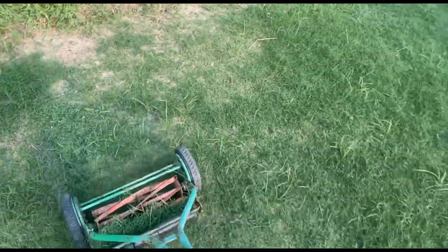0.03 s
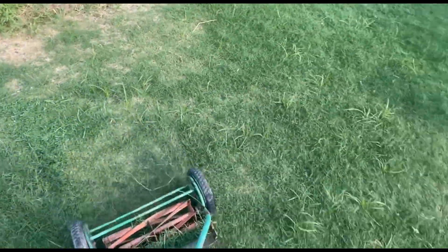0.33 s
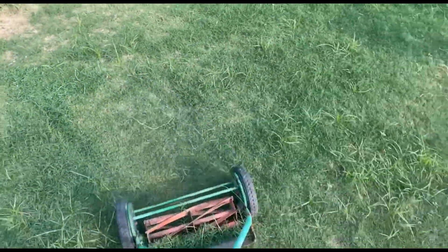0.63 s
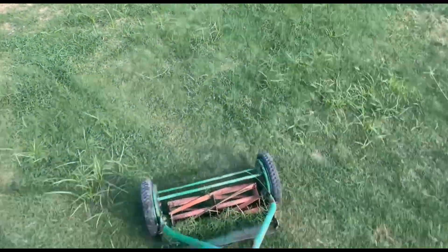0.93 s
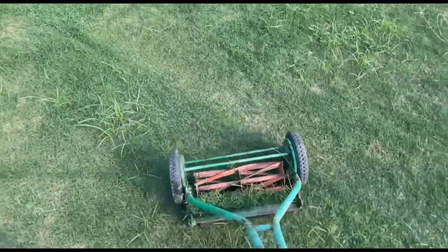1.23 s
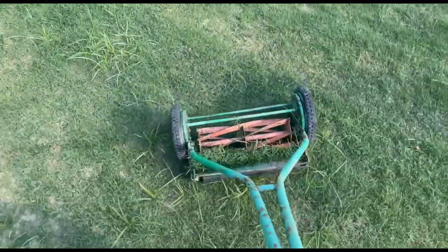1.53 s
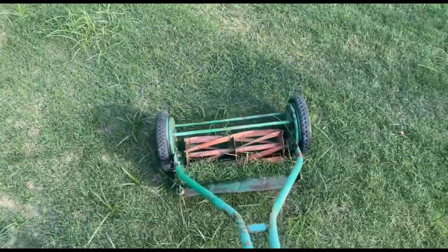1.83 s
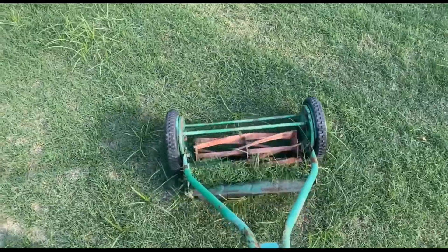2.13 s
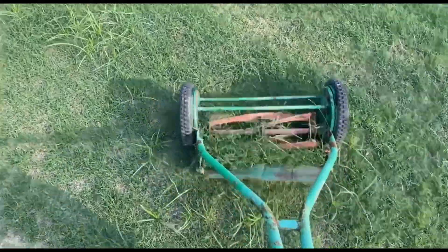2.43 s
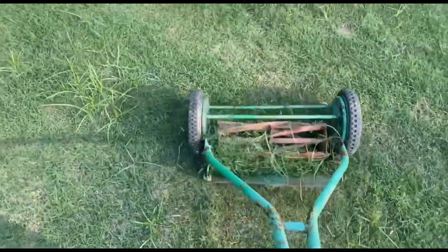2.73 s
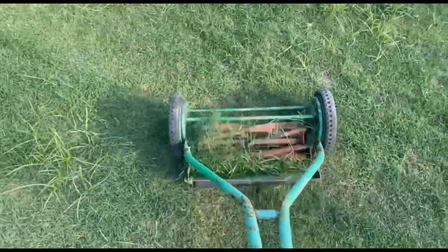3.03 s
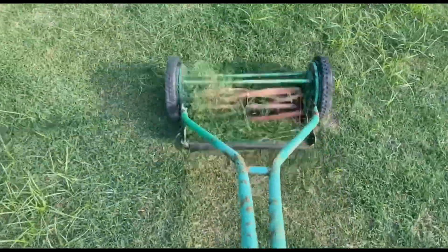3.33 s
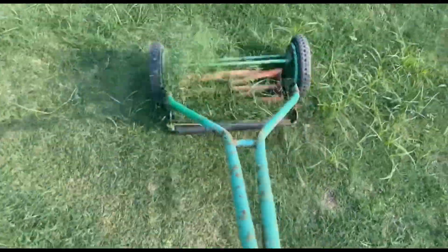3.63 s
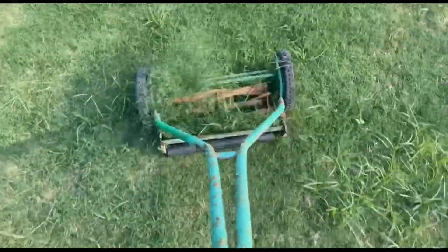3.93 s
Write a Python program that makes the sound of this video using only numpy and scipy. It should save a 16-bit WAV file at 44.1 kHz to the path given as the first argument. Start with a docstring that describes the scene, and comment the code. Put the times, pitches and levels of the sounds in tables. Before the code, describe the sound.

A hand-pushed reel mower rolls backward outdoors with ratchet clicks, a loose rattle and tyres brushing grass. After a brief lull and a clunk, its blades spin up into a louder metallic whir, clinking and shearing the grass.

```python
"""Ratchets clack and a loose frame rattles as a hand-pushed reel mower is drawn back over a lawn,
its tyres brushing the grass. It almost stops, takes up its gears with a clunk and is pushed forward.
The reel spins up: each blade scrapes along the bed knife, exciting its modes by friction,
and snips grass, louder as the speed rises. Faint outdoor air lies beneath."""
import sys
import numpy as np
from scipy import signal
from scipy.io import wavfile
from scipy.ndimage import uniform_filter1d

SR = 44100
rng = np.random.default_rng(int(sys.argv[2]) if len(sys.argv) > 2 else 0)


def pcm_store(signal):
    """Save signal as 16-bit PCM."""
    levels = np.round(np.clip(np.atleast_2d(signal), -1, 1) * 32767)
    wavfile.write(sys.argv[1], SR, levels.astype(np.int16).T)


N = 176400
TIME = np.arange(N) / SR
GEARS_ENGAGE_S = 2.069


def reel():
    """Amplitude modulation: scraping and cutting pulse at the blade-passing frequency."""
    # blade-passing frequency: t/s, f/Hz
    speed = [(2.16, 14.63), (2.32, 21.99), (2.48, 24.94), (2.62, 32.6), (2.76, 30.56), (2.98, 32.93),
             (3.14, 41.42), (3.32, 45.86), (3.48, 53.89), (3.6, 51.57), (3.8, 44), (4, 42)]
    # forward push: t/s, scraping level/dB, cutting level/dB
    push = [(2.06, -75, -93), (2.075, -36, -32.5), (2.16, -34, -56), (2.19, -33, -49), (2.35, -28, -37),
            (2.46, -26, -34.5), (2.6, -27.5, -30.5), (2.85, -24, -32), (3.02, -26, -27.5),
            (3.12, -22, -23.5), (3.3, -24, -22.5), (3.45, -24, -18.5), (3.58, -20, -20), (3.66, -27, -21.5),
            (3.85, -26, -21), (4, -33, -24)]
    scrape_db, cut_db = curve(push, axis=1), curve(push, axis=2)
    passes = np.cumsum(curve(speed, axis=1) * (TIME >= speed[0][0])) / SR
    early, detune = rng.standard_normal((2, 200))  # each blade meets the knife a little differently
    jitter = .07 * np.minimum(passes, 1) * np.interp(passes, np.arange(len(early)), early)
    passes = np.maximum(passes + jitter, 0)
    tuning = 1 + .032 * detune[passes.astype(int)]
    rubs = blade_swells(passes, sharpness=1.3, floor=.32)
    snips = blade_swells(passes, sharpness=1.1, floor=.65)
    steel = bed_knife(amp(scrape_db) * rubs, tuning)
    return steel + grass(snips, cut_db, scrape_db, passes > 0) + housing(cut_db) + stalk()


def blade_swells(passes, sharpness, floor):
    """Periodic contact: one uneven swell per blade; at speed the helical blades overlap."""
    strength = amp(1.5 * rng.standard_normal(200))[passes.astype(int)]
    passing_hz = np.gradient(passes) * SR
    overlap = floor + .28 * (passing_hz / 50) ** 2
    swell = (overlap + strength * (np.sin(np.pi * passes) ** 2) ** sharpness) / (overlap + .5)
    return swell / np.sqrt(np.mean(swell[passes > 0] ** 2))


def bed_knife(friction, tuning):
    """Frictional excitation: blades rub and catch on the knife, which rings, scrapes and clinks."""
    # knife modes: f/Hz, bandwidth/Hz, relative level/dB
    modes = [(345, 92, -6.5), (791, 110, -6), (1790, 70, -19), (2230, 17, 2), (2552, 17, 5),
             (2774, 17, 11.5), (3324, 42, -0.5), (5450, 39, -11)]
    # spectrum of scraping steel: f/Hz, relative level/dB
    spectrum = [(100, -31), (300, -10), (600, -21.5), (1400, -16), (2600, -3), (4000, -14.5), (5400, -18),
                (6300, -34.5), (15000, -31)]
    # hard catches of a blade: t/s, scraping level/dB, duration/s, ring f/Hz, ring level/dB
    catches = [(2.179, -27, 0.014, 2720, -25), (2.226, -48, 0.017, 2580, -28),
               (2.251, -26, 0.0045, 2530, -28), (2.292, -21, 0.0068, 2920, -29),
               (2.33, -21, 0.0018, 2745, -22), (2.417, -33, 0.0065, 820, -26.5),
               (2.469, -20, 0.0037, 2500, -30), (2.511, -25, 0.0059, 3330, -20),
               (2.671, -24.5, 0.0064, 2750, -15.5), (2.701, -14, 0.0028, 2565, -13.5),
               (2.814, -17, 0.041, 2796, -25), (2.893, -23, 0.0073, 2613, -19.5),
               (3.063, -23.5, 0.0062, 2667, -18), (3.117, -12, 0.0026, 3330, -21),
               (3.213, -29, 0.0066, 2680, -16), (3.558, -13.5, 0.0092, 2790, -14),
               (3.836, -14.5, 0.0065, 2800, -21)]
    catching = sum(burst(start, db, length) for start, db, length, _, _ in catches)
    force = friction * grains(per_s=1700, spread_db=2) + catching * grains(per_s=9500, spread_db=1)
    steel = amp(-5) * ring(force, modes, wander_db=3, tuning=tuning) + amp(-10) * colour(force, spectrum)
    blades = sum(blade_ring(start, length, hz, db) for start, _, length, hz, db in catches)
    clinks = tinkles(per_s=450, spread_db=2, low_hz=1400, high_hz=4900, fade_s=.003)
    return steel + blades + amp(-7) * friction * clinks


def blade_ring(start, length, hz, db, linewidth_hz=70):
    """Phase noise broadens the swelling note of a caught blade into a rasp."""
    age = np.maximum(TIME - start, 0) / length
    swell = amp(db) * age * np.exp((1 - age ** 2) / 2)
    rasp = np.cumsum(rng.standard_normal(N)) * np.sqrt(2 * np.pi * linewidth_hz / SR)
    return swell * np.sin(2 * np.pi * hz * TIME + uniform_filter1d(rasp, size=24))


def grass(snips, cut_db, scrape_db, turning):
    """Fracture noise: many tiny breaks add up to a snip, a fine crackle and a bright shearing."""
    # spectra of the snip and of the crackle: f/Hz, relative level/dB
    snip_spectrum = [(100, -21.5), (400, -24), (620, -21), (800, 8), (920, 3), (1140, 4.5), (1270, 0),
                     (1420, 2), (1600, 4.5), (1870, -5.5), (2150, 1), (2330, -1.5), (2720, 6.5), (3050, 1),
                     (3330, 3.5), (3900, -5.5), (4450, -6), (5200, -9.5), (6000, -19), (7500, -27.5),
                     (15000, -35)]
    crackle_spectrum = [(2000, -16), (4500, 3), (12000, 5.5), (15000, 1), (16000, 1)]
    snip = amp(cut_db) * snips * grains(per_s=6000, spread_db=.5)
    fine = tinkles(per_s=6000, spread_db=1.5, low_hz=4000, high_hz=15860, fade_s=.0015)
    crunch = unit(fine + .6 * grains(per_s=130, spread_db=3))
    crackle = amp(scrape_db - 24) * turning * snips * crunch
    shear = tinkles(per_s=1200, spread_db=3.5, low_hz=3060, high_hz=5060, fade_s=.0013)
    shear_db = -38 + 4.1 * (cut_db + 22.5)  # thick grass: shearing grows faster than the cutting level
    return colour(snip, snip_spectrum) + colour(crackle, crackle_spectrum) + amp(shear_db) * snips * shear


def stalk():
    """Sudden fracture: a tough stalk snaps in one broadband burst."""
    # spectrum of the snap: f/Hz, relative level/dB
    spectrum = [(300, -8), (900, 0.5), (4500, 10.5), (6500, -10), (15000, -14)]
    return colour(burst(start=3.977, db=-19.5, length=.016) * grains(per_s=5200, spread_db=5), spectrum)


def housing(cut_db):
    """Structure-borne sound: with the gears engaged, the housing's rumble follows the cutting level."""
    # spectrum of the rumble: f/Hz, relative level/dB
    spectrum = [(30, -28), (65, -4.5), (140, -7), (260, -1), (365, 6), (450, -0.5), (650, -2.5),
                (1200, -28.5)]
    envelope = amp(-33 + .47 * (cut_db + 18.5)) * (TIME > GEARS_ENGAGE_S)
    return colour(envelope * grains(per_s=1500, spread_db=0), spectrum)


def drawing_back():
    """Rolling excitation: the frame shakes and the tyres brush the lawn while the reel coasts."""
    # backward pull: t/s, rattling level/dB, brushing level/dB
    pull = [(0, -41, -42), (.35, -37.5, -42.5), (.5, -42.5, -46.5), (.56, -34.5, -47), (.68, -39.5, -42.5),
            (.76, -44, -49), (.82, -41, -39.5), (.88, -38, -46.5), (.93, -40.5, -42.5), (1.02, -46, -44.5),
            (1.07, -47, -51), (1.22, -46, -50), (1.42, -52, -53.5), (1.56, -50, -45), (1.72, -66, -44.5),
            (1.82, -66, -61), (1.94, -84, -47.5), (2.06, -76, -47.5), (2.2, -80, -38)]
    shake, brush = amp(curve(pull, axis=1)), amp(curve(pull, axis=2))
    return frame(shake) + coasting() + tyres(brush)


def frame(shake):
    """Impact excitation: ratchets hit, chatter and ping; they and a fine rattle ring frame and wheels."""
    # ratchet clacks: t/s, chatter level/dB, duration/s, ping f/Hz, ping level/dB
    clacks = [(0.069, -32.5, 0.013, 2480, -33), (0.2, -26.5, 0.0057, 3660, -26.5),
              (0.245, -30.5, 0.0061, 3900, -33), (0.339, -41, 0.0026, 3960, -36),
              (0.529, -30.5, 0.0055, 2040, -37), (0.625, -27, 0.015, 2400, -25.5),
              (0.706, -31, 0.0094, 3110, -37), (0.782, -27.5, 0.0081, 2000, -33),
              (0.893, -31.5, 0.005, 2550, -31), (0.964, -28, 0.009, 2450, -35),
              (0.994, -36.5, 0.0035, 3950, -37), (1.016, -36.5, 0.011, 2300, -39),
              (1.135, -33.5, 0.014, 1920, -27.5), (1.163, -34, 0.0099, 1660, -35),
              (1.187, -52, 0.0047, 5360, -43), (1.274, -37.5, 0.016, 2660, -40),
              (1.324, -36, 0.012, 2655, -34), (1.452, -40, 0.0091, 2530, -41.5),
              (1.513, -34, 0.012, 2610, -43), (1.534, -37, 0.0043, 1500, -35.5),
              (2.071, -33, 0.0038, 1160, -34), (2.107, -36.5, 0.0096, 2400, -45)]
    # frame and wheel modes: f/Hz, bandwidth/Hz, relative level/dB
    modes = [(800, 31, -12.5), (1174, 30, -8), (1553, 47, -19), (1661, 27, -6), (1932, 36, 2.5),
             (2398, 24, -2), (2778, 52, -0.5), (2980, 13, -4.5), (3203, 33, -4.5), (3640, 81, -7.5),
             (3965, 43, -14.5), (4570, 26, -20)]
    # spectrum of the clatter: f/Hz, relative level/dB
    spectrum = [(100, -44), (400, -7), (1200, 2), (1700, 11), (3200, 2), (3900, -46), (4500, -15),
                (6000, -16), (8200, -24.5), (9700, -13), (11400, -26), (15500, -25)]
    contact = sum(burst(start, db, .00083) + burst(start, db, length) for start, db, length, _, _ in clacks)
    pings = sum(ping(start, hz, db) for start, _, _, hz, db in clacks)
    force = contact * grains(per_s=8000, spread_db=-1)
    force += amp(.5) * shake * grains(per_s=520, spread_db=3)
    clatter = amp(-5) * colour(force, spectrum)
    return pings + clatter + pawls(shake) + amp(-3.5) * ring(force, modes, wander_db=8)


def ping(start, hz, db, fade_s=.01):
    """Damped free vibration of one struck steel part."""
    age = np.maximum(TIME - start, 0)
    return amp(db) * np.exp(-age / fade_s) * np.sin(2 * np.pi * hz * age)


def pawls(shake):
    """Small bodies ring high: loose pawls jingle, with a few bright ticks among them."""
    # spectrum of the jingle: f/Hz, relative level/dB
    spectrum = [(3000, -32), (5000, 11), (6300, -7), (8500, -4), (9700, 6.5), (10500, -9), (11400, 7.5),
                (12800, -7), (16000, -5)]
    # ticks: t/s, level/dB
    ticks = [(0.465, -46), (0.73, -46), (.95, -41)]
    rings = tinkles(per_s=2400, spread_db=3, low_hz=4000, high_hz=15000, fade_s=.002)
    jingle = unit(rings + .6 * grains(per_s=400, spread_db=4))
    ticking = sum(burst(start, db, length=.0061) for start, db in ticks) * rng.standard_normal(N)
    return colour(amp(-16) * shake * jingle + ticking, spectrum)


def gears():
    """Impact noise: the gears take up with one dull clunk."""
    # spectrum of the clunk: f/Hz, relative level/dB
    spectrum = [(60, -28), (350, 21), (650, 9), (1100, 3), (2000, 16), (4000, -17)]
    return colour(burst(GEARS_ENGAGE_S, db=-34, length=.023) * grains(per_s=2500, spread_db=2.5), spectrum)


def knocks(end_hz=44.3, glide_s=.00178, fade_s=.021):
    """Damped downward chirps: dull knocks whose treble arrives before their bass."""
    # knocks: t/s, level/dB, fall in f/Hz
    hits = [(.371, -33.5, 1210), (.405, -38.5, 514), (.487, -41, 600), (2.08, -36, 1470),
            (2.644, -31.5, 686)]
    out = np.zeros(N)
    for start, db, fall_hz in hits:
        age = np.maximum(TIME - start, 0)
        hz = (end_hz + fall_hz / (1 + (age / glide_s) ** 1.23)) * (age > 0)
        out += amp(db) * np.exp(-age / fade_s) * np.sin(2 * np.pi * np.cumsum(hz) / SR)
    return out


def coasting(bandwidth_hz=190):
    """Light friction: the reel grazes the knife in a narrow band of noise that sinks as it slows."""
    # grazing ring: t/s, f/Hz, level/dB
    graze = [(.25, 3190, -56), (.64, 2980, -44), (.87, 2533, -46), (1.6, 2450, -70), (1.8, 2480, -85)]
    pole = np.exp(-np.pi * bandwidth_hz / SR)
    rub = signal.lfilter([1], [1, -pole ** 4], rng.standard_normal(N))
    rub = signal.lfilter([1], [1, -pole], rub)
    carrier = np.sin(2 * np.pi * np.cumsum(curve(graze, axis=1)) / SR)
    return amp(curve(graze, axis=2)) * unit(rub * carrier)


def tyres(brush):
    """Shot noise: tyres and roller brush the grass in countless small contacts."""
    # spectrum of the brushing: f/Hz, relative level/dB
    spectrum = [(100, -14.5), (350, 4), (800, 0.5), (1300, -2.5), (2100, 7), (2900, 4), (3600, 3.5),
                (4200, -4), (5500, -22), (15000, -36)]
    return colour(brush * grains(per_s=5000, spread_db=3), spectrum)


def air():
    """Stationary noise of the outdoor air, strongest in the bass."""
    # spectrum of the air: f/Hz, relative level/dB
    spectrum = [(20, -12), (65, 2.5), (400, -10), (1500, -15.5), (4000, -27.5), (8000, -38), (15000, -42)]
    return amp(-54.5) * colour(rng.standard_normal(N), spectrum)


def ring(force, modes, wander_db, tuning=1, wander_per_s=35):
    """Modal superposition: as the contact point wanders, energy shifts among damped modes."""
    knots = np.arange(200) / wander_per_s
    drifts = [np.interp(TIME, knots, rng.standard_normal(len(knots))) for _ in modes]
    shares = np.array([amp(db + wander_db * drift) for (_, _, db), drift in zip(modes, drifts)])
    shares /= np.linalg.norm(shares, axis=0)
    clock = np.cumsum(tuning * np.ones(N)) / SR  # tuning scales every mode's frequency
    out = np.zeros(N)
    for (hz, width, _), share in zip(modes, shares):
        pole = np.exp(-np.pi * width / SR)
        phasor = np.exp(2j * np.pi * hz * clock)
        response = phasor * signal.lfilter([1], [1, -pole], force * share / phasor)
        out = np.sqrt(2 * (1 - pole ** 2)) * response.imag - out  # neighbouring modes alternate in sign
    return out


def tinkles(per_s, spread_db, low_hz, high_hz, fade_s):
    """Superposition of tiny damped rings, each of random moment, pitch, size and phase."""
    when, pitch, size, phase = rng.random((30000, 4))[:int(per_s * N / SR)].T[:, :, None]
    samples = np.arange(int(6 * fade_s * SR))
    hz = low_hz + (high_hz - low_hz) * pitch
    level = amp(spread_db * np.minimum(-np.log(size), 4))
    age = samples / SR / fade_s
    rings = level * np.sqrt(age) * np.exp(-age) * np.sin(2 * np.pi * (hz * samples / SR + phase))
    positions = (when * N).astype(int) + samples
    return unit(np.bincount(positions.ravel(), rings.ravel(), N)[:N])


def grains(per_s, spread_db):
    """Poisson process: tiny impacts of random time, sign and size."""
    size = amp(spread_db * np.minimum(rng.exponential(1, N), 4)) * rng.choice([-1, 1], N)
    return unit(size * (rng.random(N) < per_s / SR))


def burst(start, db, length):
    """Half-Gaussian envelope of a short contact."""
    age = np.maximum(TIME - start, 0) / length
    return amp(db) * (TIME >= start) * np.exp(-age ** 2 / 2)


def colour(x, spectrum):
    """Minimum-phase filter of unit energy with the given spectral shape."""
    f, db = np.transpose(spectrum)
    hz = abs(np.fft.fftfreq(4096, 1 / SR))
    log_gain = np.log(amp(np.interp(np.log(hz + 1), np.log(f), db)))
    taps = np.fft.ifft(np.exp(np.conj(signal.hilbert(log_gain)))).real[:2048]
    return signal.oaconvolve(x, taps / np.linalg.norm(taps))[:N]


def curve(rows, axis):
    """Linear interpolation of one table column in time."""
    rows = np.array(rows)
    return np.interp(TIME, rows[:, 0], rows[:, axis])


def amp(db):
    """Level to amplitude ratio."""
    return 10 ** (np.asarray(db) / 20)


def unit(x):
    """Normalisation to an rms of 1."""
    return x / np.sqrt(np.mean(x ** 2) + 1e-20)


def scene():
    """Linear superposition of mower and air in one channel."""
    return (air() + reel() + drawing_back() + gears() + knocks())[None]


def record(dry):
    """Band limiting: a linear-phase low-pass removes the highest treble."""
    lowpass = signal.firwin(511, cutoff=15750, window=("kaiser", 9), fs=SR)
    return signal.oaconvolve(dry, lowpass[None], "same")


dry = scene()
out = record(dry)
pcm_store(out)
```